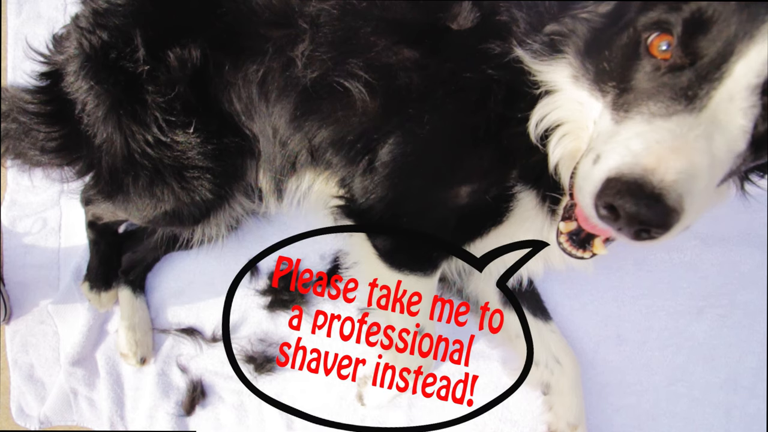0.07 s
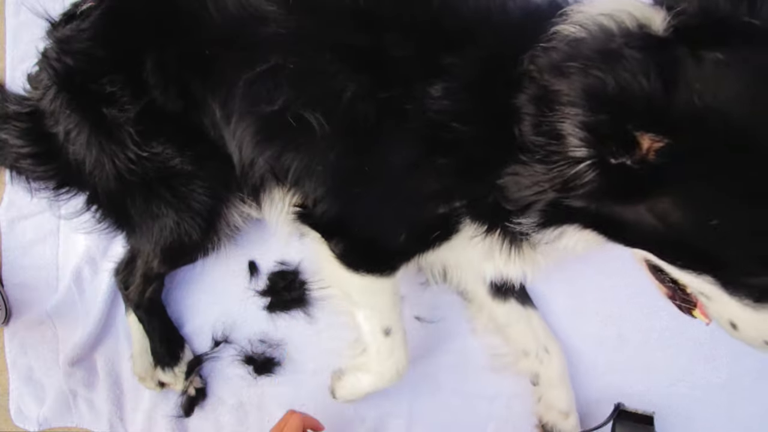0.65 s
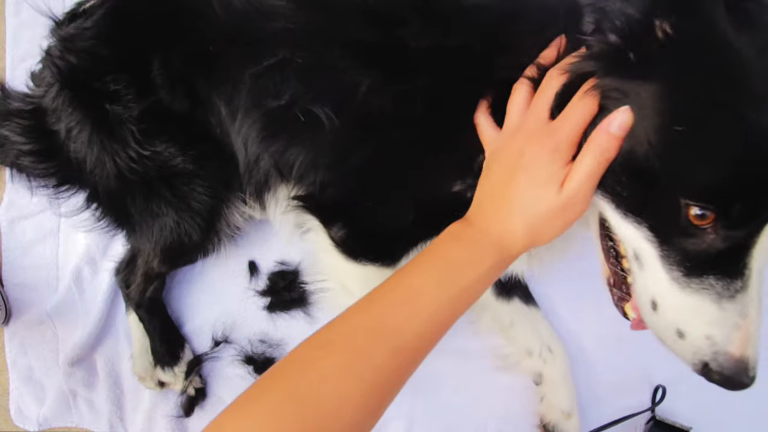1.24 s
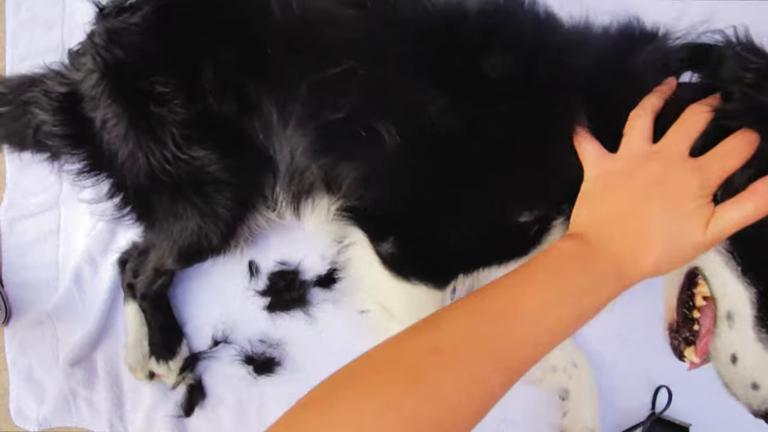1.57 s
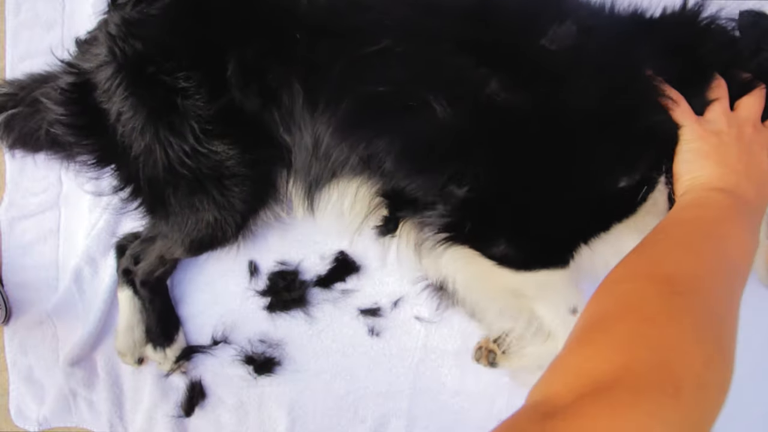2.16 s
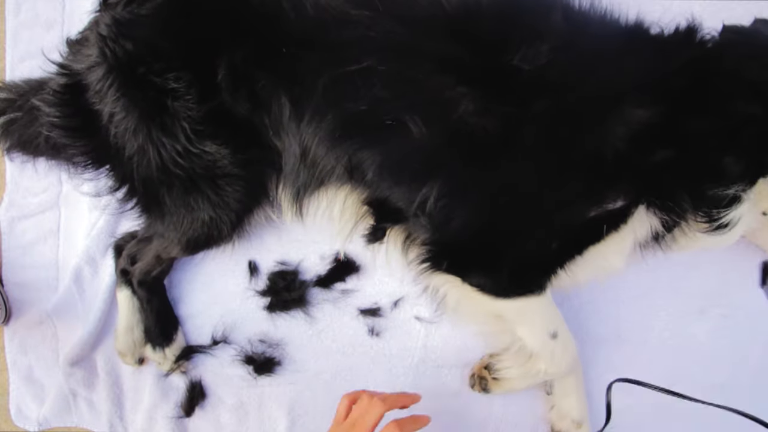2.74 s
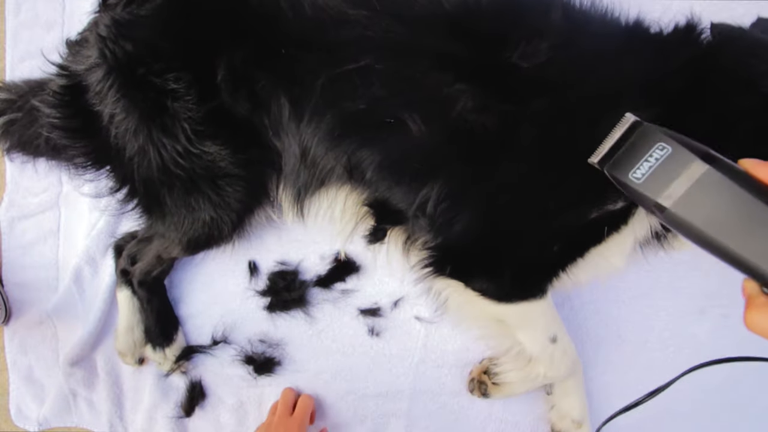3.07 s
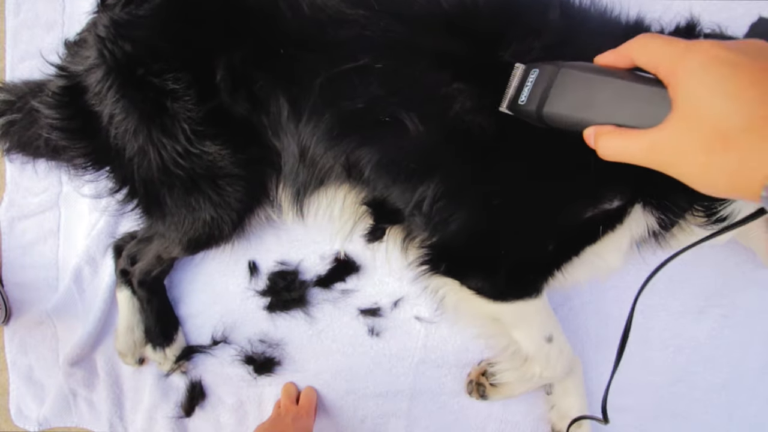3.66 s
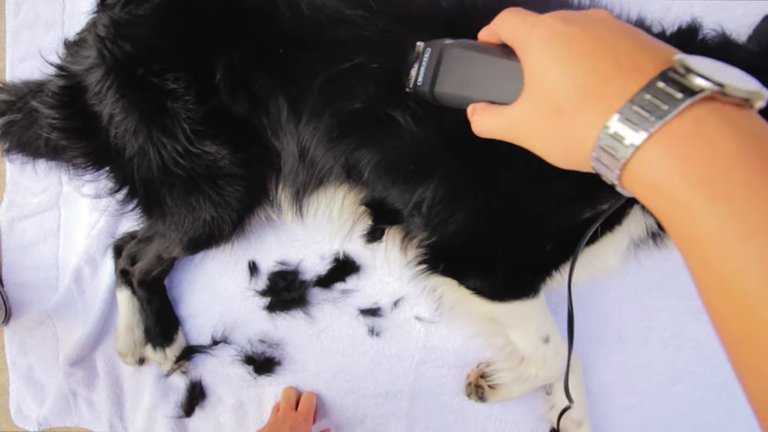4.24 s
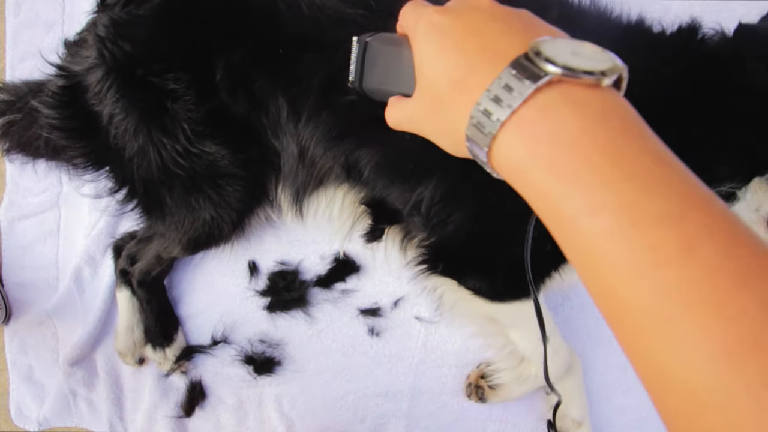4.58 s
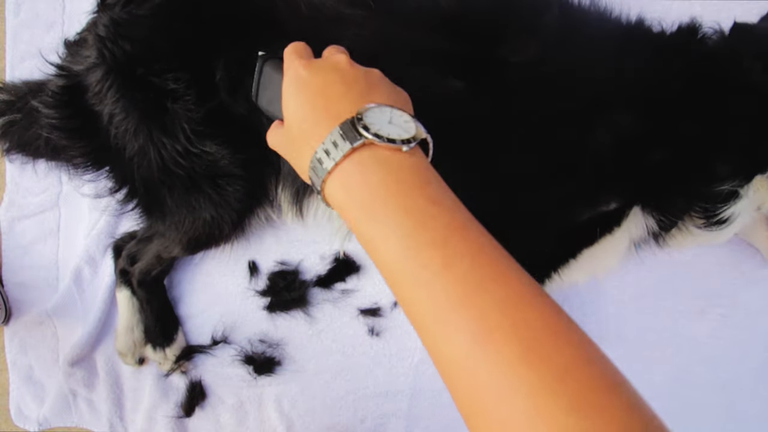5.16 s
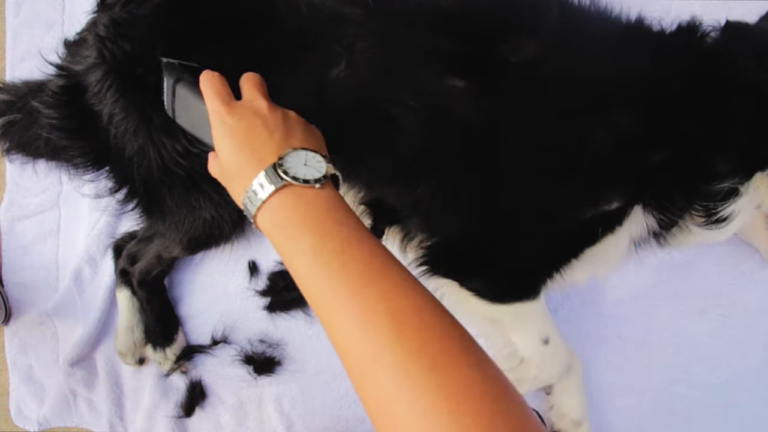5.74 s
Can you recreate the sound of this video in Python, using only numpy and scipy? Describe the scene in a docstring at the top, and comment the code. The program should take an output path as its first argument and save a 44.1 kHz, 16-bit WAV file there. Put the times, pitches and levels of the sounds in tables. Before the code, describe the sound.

After half a second of silence, a soft, steady wash of background noise begins. A small dry tick comes at 0.7 seconds, followed by a few faint, distant chirps until 1.5. From 1.4 to 2.8 seconds a hand strokes a dog, with a light hiss of fur, a rustling sheet and a few more ticks. Metal collar tags clink around 2 seconds and again at 2.4. Just after a tiny high ping and a soft bump, an electric clipper switches on at 2.9 seconds with a very loud, sharp snap. It then buzzes close by at a constant pitch, brightest around 3.3 seconds, its tone shifting as it turns in the hand. The case rubs dully on the coat, and the blades crunch and fizz through fur at about 3.6, 4.1 and 5.1 seconds, the second pass strongest. The buzz continues to the end, near 6 seconds.

```python
"""On a sheet, in a steady wash of noise with faint far chirps, a dog is stroked and its collar tags clink.
A corded clipper is switched on: the armature's impact rings the case with a loud, clipped snap.
Driven by the mains, it then buzzes at twice the mains frequency. Its radiation is directional, so the
tone shifts as it turns in the hand. The blades crunch through the fur in three passes, each a swarm of
snapping hairs, over the friction noise of the case on the coat."""
import sys
import numpy as np
from scipy import signal
from scipy.fft import rfft, irfft, next_fast_len
from scipy.io import wavfile
from scipy.ndimage import map_coordinates

SR = 44100
rng = np.random.default_rng(int(sys.argv[2]) if len(sys.argv) > 2 else 0)


def persist_wave(psi):
    """Save psi, clipped to +-1, as 16-bit WAV."""
    counts = np.round(np.clip(psi, -1, 1) * 32767).astype(np.int16)
    wavfile.write(sys.argv[1], SR, np.atleast_2d(counts).T)


N = 256220
T = np.arange(N) / SR
ON_S, STROKE_HZ = 2.881, 120  # the clipper starts; its stroke rate is twice the mains frequency
RUNNING = T >= ON_S

# Spectral envelope of the buzz, lower part: (harmonic number, level [dB])
BUZZ_LOW = [(1, -18), (2, -22.5), (3, -11), (4, -22), (6, -17.5), (7, -9), (8, -12.5), (10, -9.5),
            (11, -5.5), (12, -10.5), (14, -10.5), (16, -10), (17, -4), (20, -5), (21, -10), (22, -10),
            (23, -10), (24, -6), (26, -10.5), (27, -8), (30, -7.5), (31, -12.5), (32, -8.5), (33, -17),
            (34, -7.5), (35, -16.5)]
# Its upper part: (frequency [Hz], level [dB])
BUZZ_HIGH = [(4400, -14), (4800, -14), (5200, -15.5), (6200, -17.5), (6500, -13.5), (7900, -8),
             (8700, -15.5), (9400, -17), (10600, -19), (12100, -21), (12900, -21), (14300, -23),
             (15700, -23)]
# Registers of hum, housing, blade, blade tick and sizzle: (first harmonic, last harmonic)
REGISTERS = [(1, 14), (15, 26), (27, 52), (53, 78), (79, 131)]
# Response of each register: (level [dB], share of facing level, share of pressure level)
REGISTER_RESPONSE = [(-38.5, 0.06, 0.66), (-38.8, .22, 0.02), (-37.8, .38, .22), (-41, 1.02, .02),
                     (-51, .25, .55)]
# Blade resonance, moving with grip and load: (time [s], frequency [Hz])
BLADE_RESONANCE = [(3.1, 2950), (3.22, 3980), (3.5, 3940), (3.8, 3530), (4.7, 3430), (5.05, 3650),
                   (5.3, 3700), (5.5, 3080)]
# How squarely the blade faces the microphone: (time [s], level [dB])
FACING = [(2.92, -19), (3.05, -10.5), (3.2, -2), (3.32, 0), (3.64, -11), (4.0, -8.5), (4.35, -13),
          (5.1, -15), (5.501, -11)]
# Pressure of the case on the coat: (time [s], level [dB])
PRESSURE = [(3.03, -16), (3.18, -1), (3.6, 0.5), (4.3, -2), (4.65, -6), (5.05, -7), (5.5, -4)]
DRIFT_HZ, DRIFT_RAD = 3.195, .41  # rate and phase depth of each harmonic's wander

def clipper_buzz(trim_db=-.36, blade_db=5, blade_width_hz=380, steel_hz=7950, steel_width_hz=800):
    """Forced vibration: the armature drives the blade, and resonances colour its harmonics."""
    t = T[RUNNING]
    stroke_phase = 2 * np.pi * STROKE_HZ * t
    blade_hz, facing_db, press_db = (curve(rows, t) for rows in (BLADE_RESONANCE, FACING, PRESSURE))
    colour = [(round(k) * STROKE_HZ, db) for k, db in BUZZ_LOW] + list(BUZZ_HIGH)
    # reflections off hand and body interfere, most deeply for short waves
    interference = [(1500, 3), (5000, 5)]  # (frequency [Hz], depth [dB])
    y = np.zeros(N)
    for (first, last), (db, by_facing, by_press) in zip(REGISTERS, REGISTER_RESPONSE):
        is_tick = first * STROKE_HZ > 6300
        harmonics = np.zeros(len(t))
        for k in range(first, last + 1):
            if k in RESONANT_HARMONICS or k == CONTACT_HARMONIC:
                continue
            hz = k * STROKE_HZ
            # harmonics nearly in phase make one tick a stroke; the case smears the rest
            spread_rad = .35 if is_tick and hz < 11500 else np.pi
            phase = k * stroke_phase + spread_rad * rng.standard_normal()
            phase += DRIFT_RAD * wobble(DRIFT_HZ, t)
            blade_ring_db = blade_db / (1 + ((hz - blade_hz) / blade_width_hz) ** 2)
            steel_ring_db = 3 * amp(facing_db) / (1 + ((hz - steel_hz) / steel_width_hz) ** 2)
            wander_db = along(interference, hz) * np.minimum(wobble(DRIFT_HZ, t), 1.5)
            gain = amp(along(colour, hz) + blade_ring_db + steel_ring_db + wander_db)
            harmonics += gain * np.sin(phase)
        level_db = db + by_facing * facing_db + by_press * press_db + trim_db
        flutter = 1 + is_tick * .11 * wobble(STROKE_HZ, t)
        y[RUNNING] += amp(level_db) * unit(harmonics) * flutter
    return y


# Harmonics at which the case resonates: (harmonic number)
RESONANT_HARMONICS = [9, 13, 15, 18, 19, 25, 28, 29, 36]
# Their radiation lobes: (harmonic number, level [dB], aim [deg], half width [deg])
LOBES = [(9, -37, 6.7, 20), (9, -44.5, 52, 27), (13, -43, 44, 11), (15, -41, 14, 14),
         (15, -42.5, 80.5, 6.3), (18, -39, 48, 29), (19, -36.3, 20, 9.5), (19, -38.5, 50.6, 10.3),
         (25, -46.5, 76, 20), (28, -43.5, 50, 19), (28, -46.5, 78, 12.5), (29, -42.6, 61, 23),
         (36, -45.5, 38, 19.6)]
# The clipper turns in the hand: (time [s], angle [deg])
ROTATION = [(2.9, 0), (3.5, 40.5), (5.0, 70.5), (5.8, 90.5)]
CONTACT_HARMONIC = 5  # brought out by pressure on the dog

def case_resonances(off_lobe_db=-56, contact_db=-46, swell_db=3, trim_db=-1.1, drift_db=1.1):
    """Directivity: the case beams its resonant harmonics in lobes that sweep past as it turns."""
    t = T[RUNNING]
    angle = curve(ROTATION, t)
    gains = {}
    for k in RESONANT_HARMONICS:
        lobes = sum(amp(db) * bell(angle - aim, width) for n, db, aim, width in LOBES if round(n) == k)
        gains[k] = np.hypot(lobes, amp(off_lobe_db))
    gains[CONTACT_HARMONIC] = amp(contact_db + .42 * curve(PRESSURE, t))
    labour_db = swell_db * blade_load()[RUNNING]
    y = np.zeros(N)
    for k, gain in gains.items():
        phase = np.pi * rng.standard_normal() + DRIFT_RAD * wobble(DRIFT_HZ, t)
        rms = gain * amp(trim_db + labour_db + drift_db * wobble(DRIFT_HZ, t))
        y[RUNNING] += rms * np.sqrt(2) * np.sin(2 * np.pi * k * STROKE_HZ * t + phase)
    return y


def under_load(buzz, shake=.12, lag_s=1.5e-5):
    """Amplitude and phase modulation: hair between the blades makes the strokes uneven."""
    load = blade_load()
    delay_s = lag_s * load * wobble(45)
    strength = 1 + shake * load * wobble(60)
    return strength * map_coordinates(buzz, [(T - delay_s) * SR])


# Passes through the fur: (start [s], hold [s], crunch level [dB], fizz level [dB])
PASSES = [(3.6, .04, -43.5, -41.5), (4.05, .11, -38, -39.5), (5.06, .25, -42.2, -46.3)]

def cutting_gains(stray_db=-52):
    """Incoherent sources add in power: crunch and fizz gains of the passes plus stray hairs."""
    stray = amp(stray_db + .47 * curve(PRESSURE))
    crunch, fizz = gestures(PASSES, rise_s=.045, fall_s=.081)
    return np.hypot(crunch, stray), np.hypot(fizz, stray)


def blade_load():
    """Mechanical load follows the crunch: 1 in the thickest fur."""
    crunch, _ = cutting_gains()
    return crunch / crunch.max()


# Crunch of snapping hairs: (frequency [Hz], spectral density [dB])
CRUNCH_SPECTRUM = [(1200, -13), (1900, -7.5), (2270, -4), (2750, -5), (3100, -7), (3350, -0.5),
                   (4200, -5.5), (4800, -5.5), (5600, -10), (6600, -12.5), (8000, -24)]
# Their high fizz: (frequency [Hz], spectral density [dB])
FIZZ_SPECTRUM = [(5500, -26), (7200, -3.5), (7800, -8), (8400, 6), (9200, -1.5), (10400, -3.5),
                 (11100, -2.5), (12100, -5), (13000, -1.5), (14300, -5.5), (15700, -6)]

def hair_cutting(crunch_db=1.8, fizz_db=-1.5, clump_db=1.5, grain_db=2.8, settle_t60=.76):
    """Fracture noise: hairs snap in clumps, pulsing twice in each cycle of the blade."""
    crunch, fizz = cutting_gains()
    settling = amp(-44 - 60 * np.abs(T - ON_S) / settle_t60)  # the blades chatter as they start
    bites = 1 + .26 * np.cos(2 * np.pi * 2 * STROKE_HZ * T)
    snaps = bites * amp(clump_db * wobble(170) + grain_db * rng.standard_normal(N))
    crunching = (crunch + settling) * amp(crunch_db) * noise(CRUNCH_SPECTRUM, snaps)
    fizzing = fizz * amp(fizz_db) * noise(FIZZ_SPECTRUM, snaps)
    return (crunching + fizzing) * RUNNING


# The case sliding on the coat: (frequency [Hz], spectral density [dB])
RUB_SPECTRUM = [(30, -7), (110, -9), (250, 1), (370, 1), (600, -2.5), (850, 1), (1250, -2), (1700, -7),
                (2400, -34)]
# The case drumming on the flank: (frequency [Hz], spectral density [dB])
DRUM_SPECTRUM = [(300, -18), (350, -6.5), (400, 0), (440, -7), (520, -13)]
# Strength of that drumming: (time [s], level [dB])
DRUM_LEVEL = [(2.9, -70), (3.3, -67), (4.4, -52), (5.0, -49), (5.4, -46), (5.8, -43.5)]

def case_contact(rub_db=-41.5):
    """Sliding friction: the rub grows with pressure, while the case drums dully on the flank."""
    rub = amp(curve(PRESSURE) + rub_db) * noise(RUB_SPECTRUM)
    drum = amp(curve(DRUM_LEVEL)) * noise(DRUM_SPECTRUM)
    return (rub + drum) * RUNNING


# The switch clicks and the armature slams in: (time [s], level [dB], relative crack level [dB])
SWITCH_IMPACTS = [(2.869, -28, 2), (2.8727, -26.5, 0), (2.8792, -19.5, 7), (2.8807, 4, -18),
                  (2.8816, 7.5, -12.5), (2.8842, -13, -14), (2.8929, -22, 2), (2.914, -26, -12)]
# Modes of the plastic case: (frequency [Hz], level [dB], T60 [s])
CASE_MODES = [(600, -8.5, 0.04), (860, -0.5, 0.016), (1260, -7, 0.014), (1593, 1, 0.021),
              (1920, 2.5, 0.0093), (2555, 1, 0.019), (2990, -3.5, 0.015), (3750, -3, 0.0097),
              (4750, -1.5, 0.0098), (6490, -10.5, 0.01), (9730, -15, 0.0073)]

def switch_snap(crack_t60=.012, reverb_db=-27, reverb_t60=.2, low_cut_hz=480):
    """Impact excitation: each blow rings the case under a short crack, with faint reverberation."""
    y, t = np.zeros(N), T[:SR // 4]
    for s, db, crack_db in SWITCH_IMPACTS:
        crack = amp(crack_db - 60 * t / crack_t60) * rng.standard_normal(len(t)) / 2
        add(y, s, amp(db) * (ring(CASE_MODES, t) + crack))
    # the snap carries little bass
    y = signal.sosfilt(signal.butter(2, low_cut_hz, "high", fs=SR, output="sos"), y)
    tail = rng.standard_normal(len(t)) * amp(-60 * t / reverb_t60)
    return y + amp(reverb_db) * signal.fftconvolve(y, tail / np.linalg.norm(tail))[:N]


# Collisions of the tags: (time [s], level [dB], upper mode boost [dB], decay time factor)
TAG_CLINKS = [(1.8913, -36, 6, 1.3), (1.9203, -41, 7, 1.5), (1.9407, -42, 2, 1.2), (1.9848, -24.5, -20, .3),
              (1.9877, -19, -32, 0.52), (2.045, -26, 3, .6), (2.0608, -30, 9, 1.3), (2.0829, -31.5, 6, 1.2),
              (2.1263, -31, 0, .7), (2.3438, -43, 0, .65), (2.4272, -26, -24, 0.57), (2.44, -26.5, 1, .9),
              (2.443, -22, 0, 0.46)]
# Modes of a tag: (frequency [Hz], level [dB], T60 [s])
TAG_MODES = [(3590, -1.5, 0.02), (3675, 10, 0.034), (6290, 6.5, 0.032), (6445, -2, 0.04),
             (9800, -13, 0.061), (10200, -7, 0.11), (10660, -25, 0.11), (11570, -10, .07),
             (14800, -18, .06)]

def collar_tags(chatter_db=-10.5, chatter_t60=.027, rebound_s=.007, rebound_db=-14):
    """Damped plate vibration: tags collide, chatter and rebound; edge contacts excite upper modes."""
    y, t = np.zeros(N), T[:SR // 4]
    contact = noise([(700, 0), (2200, 3), (3300, -7), (3900, 8), (5000, 5), (6400, -2), (7200, -10),
                     (9200, -17), (10500, -17), (12000, -11), (15000, -21)])
    for s, db, bright_db, length in TAG_CLINKS:
        detune = 1 + .006 * rng.standard_normal()
        modes = [(hz * detune, level + bright_db * (hz > 5000), t60 * length)
                 for hz, level, t60 in TAG_MODES]
        chatter = amp(chatter_db - 60 * t / (chatter_t60 * length)) * contact[round(s * SR):][:len(t)]
        add(y, s, amp(db) * (ring(modes, t) + chatter))
        add(y, s + rebound_s, amp(db + rebound_db) * (ring(modes, t) + chatter))
    return y


# Ping of a small steel part: (time [s], peak level [dB])
PINGS = [(2.8102, -34.5)]
# Its modes: (frequency [Hz], level [dB], T60 [s])
STEEL_MODES = [(10140, 1.5, .1), (11250, 3, .22), (11480, -11, .1)]

def steel_ping():
    """Free vibration: a small steel part rings at its high natural frequencies."""
    y = np.zeros(N)
    for s, db in PINGS:
        add(y, s, amp(db) * ring(STEEL_MODES, T[:SR // 4]))
    return y


# Strokes of the hand: (start [s], hold [s], hair level [dB], cloth level [dB])
HAND_STROKES = [(1.38, 0.16, -51, -54), (1.9, .04, -50.5, -45.5), (2.15, .02, -57, -44),
                (2.4, 0.085, -55, -47), (2.68, 0.16, -63, -44.5)]
# Hiss of the coat: (frequency [Hz], spectral density [dB])
COAT_SPECTRUM = [(900, -3), (1900, 2.5), (3000, -1), (4300, -0.5), (6000, -2), (7500, -10), (10500, -17),
                 (12500, -11), (14500, -6), (15800, -13)]
# Rustle of the sheet: (frequency [Hz], spectral density [dB])
SHEET_SPECTRUM = [(30, -8), (120, -22), (210, 5), (310, -0.5), (450, -6), (800, -2), (1250, -5.5),
                  (2000, -14.5), (4000, -23), (8000, -45)]

def stroking(uneven_db=3):
    """Friction noise: a hand slides unevenly over the coat and shifts the sheet."""
    hair, cloth = gestures(HAND_STROKES, rise_s=.062, fall_s=.055)
    hiss = hair * amp(uneven_db * wobble(25.04)) * noise(COAT_SPECTRUM)
    rustle = cloth * amp(uneven_db * wobble(18)) * noise(SHEET_SPECTRUM)
    return hiss + rustle


# Small contacts as the dog is handled: (time [s], peak level [dB])
DRY_TICKS = [(0.7087, -31.5), (1.6762, -28), (2.1445, -34), (2.159, -35)]

def handling_ticks(t60=.024):
    """Heavy damping: each dry contact is a burst of noise with no ring."""
    y, t = np.zeros(N), T[:SR // 20]
    grit = noise([(600, -15), (1300, 9), (2300, 7), (3800, -4), (5000, -22), (12000, -41)])
    for s, db in DRY_TICKS:
        tick = amp(-60 * t / t60) * grit[round(s * SR):][:len(t)]
        add(y, s, amp(db) * tick / np.abs(tick).max())
    return y


# Bumps as clipper and dog are moved: (time [s], frequency [Hz], rms level at the crest [dB])
SOFT_BUMPS = [(2.69, 230, -51), (2.82, 206, -44), (5.13, 44.7, -50), (5.7, 75, -49)]

def handling_bumps(half_width_s=.038, spread=.23):
    """Soft impacts excite only low frequencies: short swells of narrow-band rumble."""
    y = np.zeros(N)
    for s, hz, db in SOFT_BUMPS:
        band = [(hz * (1 - spread), -12), (hz, 0), (hz * (1 + spread), -12)]
        y += amp(db) * bell(T - s, half_width_s) * noise(band)
    return y


# Far chirps and a thin squeak: (time [s], length [s], frequency [Hz], relative rise, rms level [dB])
CHIRPS = [(.83, .06, 2790, 0.017, -56.5), (0.875, 0.095, 2640, 0.021, -59),
          (1.09, 0.065, 2770, 0.019, -54.5), (1.332, 0.166, 2640, 0.0294, -60),
          (2.665, 0.16, 12300, .14, -64)]

def far_chirps(waver=.013):
    """Frequency modulation: thin wavering whistles arch up in pitch and back."""
    y = np.zeros(N)
    for s, length, hz, rise, db in CHIRPS:
        t = T[:int(length * SR)]
        arch = np.abs(np.sin(np.pi * t / length))
        pitch = hz * (1 + rise * arch + waver * wobble(95, t))
        add(y, s, amp(db) * 2 * arch * np.sin(2 * np.pi * np.cumsum(pitch) / SR))
    return y


# Background wash: (frequency [Hz], spectral density [dB])
BACKGROUND_SPECTRUM = [(15, -48), (25, -18), (96, -5.5), (267, -6), (313, -5), (349, -1.5), (421, -9),
                       (523, -7.5), (871, -4.5), (970, -5), (1450, -8.5), (2360, -19), (2770, -15.5),
                       (3090, -21), (15500, -37.5)]

def background(level_db=-43.5, waver_db=.62):
    """Broadband ambient noise at a nearly steady level."""
    return amp(level_db + waver_db * wobble(4.69)) * noise(BACKGROUND_SPECTRUM)


def amp(db):
    """Decibels to gain."""
    return 10 ** (np.asarray(db) / 20)


def unit(x):
    """Normalisation to rms 1."""
    return x / np.sqrt(np.mean(x ** 2) + 1e-20)


def bell(x, width):
    """Gaussian of height 1, halved at one width either side."""
    return .5 ** ((x / width) ** 2)


def along(points, hz):
    """Interpolation of (frequency [Hz], value) points on a log axis."""
    f, v = np.transpose(points)
    return np.interp(np.log(hz + 1), np.log(f + 1), v)


def curve(points, t=T):
    """Linear interpolation of (time [s], value) points."""
    return np.interp(t, *np.transpose(points))


def wobble(rate, t=T):
    """Smooth random modulation, rate knots a second."""
    coarse = np.linspace(t[0], t[-1], len(t) // 64)
    knots = rng.standard_normal(2048)
    return np.interp(t, coarse, map_coordinates(knots, [coarse * rate], mode="wrap"))


def gestures(rows, rise_s, fall_s):
    """Rise, hold and fall: one envelope per level column of (start [s], hold [s], levels [dB])."""
    outside = lambda s, hold: np.maximum(s - T, 0) / rise_s + np.maximum(T - s - hold, 0) / fall_s
    return sum(amp(levels)[:, None] / (1 + outside(s, hold) ** 2) for s, hold, *levels in rows)


def noise(spectrum, gate=1):
    """Gated noise of rms 1, shaped by (frequency [Hz], spectral density [dB]) points."""
    size = next_fast_len(N + 8192)
    hz = np.fft.rfftfreq(size, 1 / SR)
    low, high = spectrum[0][0], spectrum[-1][0]
    skirts = np.minimum(hz / low, 1) ** 2 / np.maximum(hz / high, 1) ** 2
    white = rfft(gate * rng.standard_normal(N), size)
    return unit(irfft(white * amp(along(spectrum, hz)) * skirts, size)[:N])


def ring(modes, t):
    """Superposition of decaying modes at slightly random strengths, peak 1."""
    y = sum((-1) ** k * amp(db + rng.standard_normal() - 60 * t / t60) * np.sin(2 * np.pi * hz * t)
            for k, (hz, db, t60) in enumerate(modes))
    return y / np.abs(y).max()


def add(track, s, sound):
    """Mix a sound into a track at time s."""
    part = track[round(s * SR):][:len(sound)]
    part += sound[:len(part)]


def scene():
    """Superposition: all sources sum in one channel."""
    surroundings = background() + stroking() + handling_bumps() + far_chirps()
    impacts = handling_ticks() + collar_tags() + steel_ping() + switch_snap()
    clipper = under_load(clipper_buzz() + case_resonances()) + case_contact() + hair_cutting()
    return (surroundings + impacts + clipper)[None]


def record(dry, silent_until_s=.473, top_hz=15750):
    """Clipping and band limiting: after an opening silence, peaks are cut flat, then low-passed."""
    clipped = np.clip(dry * (T >= silent_until_s), -1, 1)
    return signal.sosfilt(signal.ellip(12, .1, 90, top_hz, fs=SR, output="sos"), clipped)


dry = scene()
out = record(dry)
persist_wave(out)
```